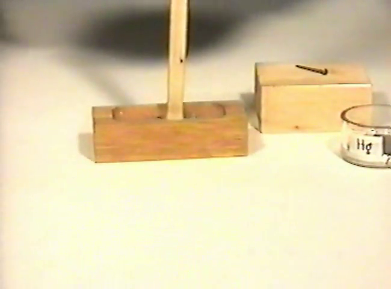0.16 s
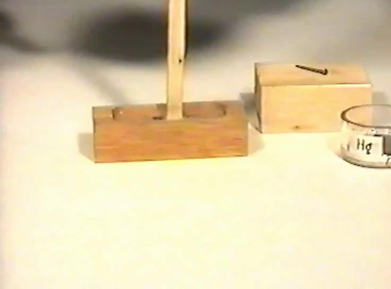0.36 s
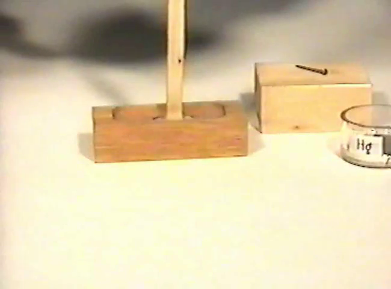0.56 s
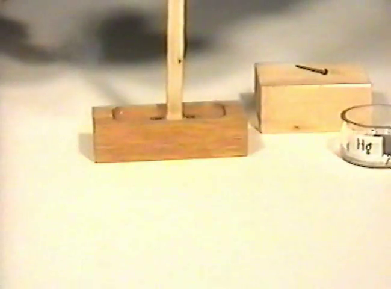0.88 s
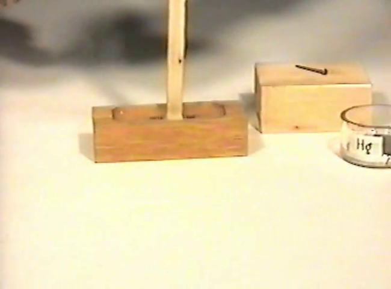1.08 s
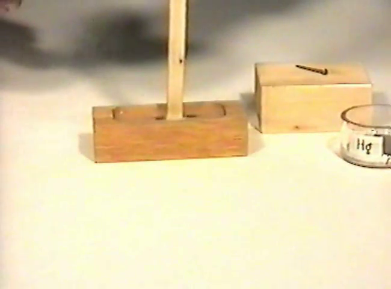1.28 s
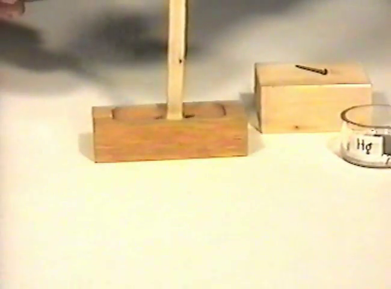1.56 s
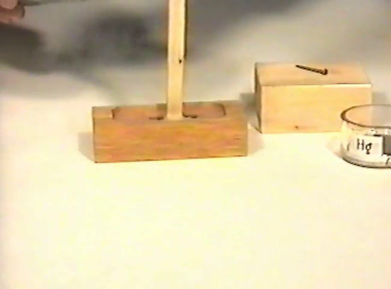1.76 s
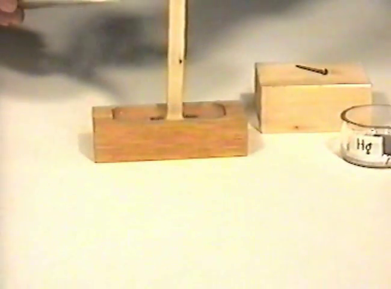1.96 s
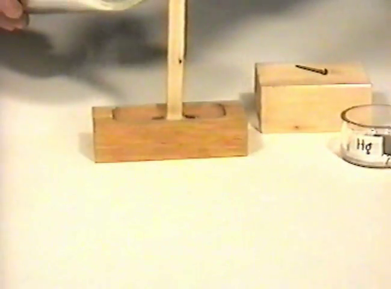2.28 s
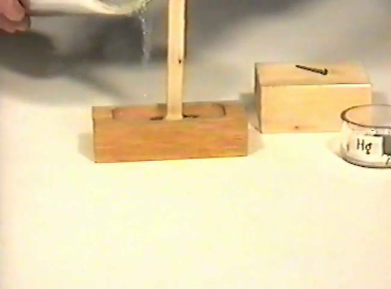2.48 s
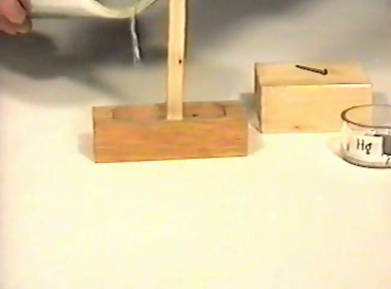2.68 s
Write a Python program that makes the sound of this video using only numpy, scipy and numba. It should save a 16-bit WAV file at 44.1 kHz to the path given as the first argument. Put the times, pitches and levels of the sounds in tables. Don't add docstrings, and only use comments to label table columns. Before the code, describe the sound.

A thin boiling fizz runs throughout, with paired wood ticks near 0.07 s, a soft one at 0.63 and a cluster at 1.06. The hiss swells brightly from 1.3 to 1.7 s with spitting splashes, ticks at 1.8, sinks near 1.9, then surges again from 2.05, strongest and fuller around 2.5-2.8 with spurts and clicks. Quiet room noise, low rumble, faint hum and wavering, hollow tape colour.

```python
import sys
import numpy as np
from scipy import signal
from scipy.fft import rfft, irfft
from scipy.io import wavfile
from scipy.ndimage import uniform_filter1d, map_coordinates
from numba import njit

SR = 44100
rng = np.random.default_rng(int(sys.argv[2]) if len(sys.argv) > 2 else 0)


def pcm_store(signal):
    levels = np.round(np.clip(np.atleast_2d(signal), -1, 1) * 32767)
    wavfile.write(sys.argv[1], SR, levels.astype(np.int16).T)


def volts_from_decibels(level):
    exponent = np.asarray(level, float) / 20
    return 10 ** exponent


N = 125244
T = np.arange(N) / SR

# (frequency [Hz], level [dB])
ROOM_SPECTRUM = [(150, -7.5), (230, -2), (500, -3.5), (1000, -6.5), (2500, -10.5), (4200, -12),
                 (6800, -12.5), (8000, -15.5), (11500, -28)]
ROOM_DB, ROOM_FLICKER_DB = -35.5, 1.28

# (frequency [Hz], level [dB])
RUMBLE_SPECTRUM = [(24, -28), (38, -5), (59, 4.5), (75, -6.5), (100, -10), (125, -19.5), (200, -26),
                   (300, -48)]
# (time [s], level [dB])
RUMBLE_SWELL = [
    (0, -43.5),
    (1.2, -46),
    (1.75, -42.5),
    (1.95, -45),
    (2.84, -42.5),
]
# (time [s], level [dB])
FLOOR_BUMPS = [(0.748, -39.5), (1.04, -45), (1.23, -39), (1.91, -38.5), (1.984, -34.5), (2.099, -41),
               (2.15, -35), (2.391, -34.5), (2.64, -36.5), (2.74, -37), (2.799, -37)]
BUMP_HZ, BUMP_S = 57, 0.032

HUM_HZ, HUM_DB = 149.7, -52.5
# (frequency [Hz], level [dB])
TAPE_SPECTRUM = [(400, -9), (1000, -9), (2300, -16), (5000, -20), (7000, -2), (10400, -3), (11000, -9),
                 (14500, -18)]
TAPE_DB = -50

# (time [s], peak level [dB], contact time [ms])
WOOD_TICKS = [(.0615, -16, .24), (.0733, -16, .45), (.628, -23, .3), (1.0542, -16, .24), (1.0596, -17, .55),
              (1.0728, -25, 1.4), (1.7886, -15, .24), (2.178, -21, .35), (2.19, -18, .45),
              (2.586, -17, .25), (2.743, -18, .4)]
RATTLE_DB, RATTLE_DECAY_S = -18, 0.006

# (time [s], level [dB], extra treble [dB])
BOIL_STRENGTH = [(0.0, -32.5, -1), (0.54, -37, 1), (0.62, -32.5, 0), (1.27, -34, 1), (1.31, -27.5, 4),
                 (1.5, -22, 2), (1.55, -24.5, 2), (1.66, -24.5, 5), (1.87, -36, 1), (2.01, -30.5, 4),
                 (2.07, -24.5, 5), (2.56, -19.5, -4), (2.63, -22.5, 0), (2.77, -19.5, -0.5), (2.84, -24, 4)]
# (frequency [Hz], level [dB])
FIZZ_SPECTRUM = [(900, -30), (1800, -12.5), (2400, -5), (4200, -3.5), (5200, -6), (6700, -3), (7900, -16),
                 (10200, -19), (11500, -50)]
# (frequency [Hz], width [Hz], level [dB])
RESONANCES = [(2267, 49, 0.5), (2723, 78, 3), (3190, 63, 5.5), (3630, 120, -1), (3940, 53, -5),
              (4900, 27, -7), (6800, 600, -11.5)]
# (time [s], level [dB], decay [s], pitch [Hz])
SPLASH_SPURTS = [(1.445, -28, .012, 3300), (1.48, -28, 0.016, 3480), (1.635, -20.5, 0.0067, 6800),
                 (2.16, -20.5, 0.0057, 3270), (2.205, -29, 0.0088, 3200), (2.32, -32, 0.022, 3180),
                 (2.501, -22, .01, 2730), (2.549, -19.5, 0.0088, 3770), (2.584, -21, 0.0043, 2700),
                 (2.72, -41, 0.0096, 3660), (2.771, -20, 0.017, 4900)]
SPURT_SPREAD = 0.16
BUBBLES_PER_S, BUBBLE_CYCLES, BUBBLE_SCATTER_DB, BUBBLE_DB = 1500, 5.9, 3.0, -7.5
GLIDE = 0.45
SPUTTER_DB, SEETHE_DB, TREBLE_HZ = 1, 0.5, 4800
NECK_HZ, NECK_WIDTH_HZ, NECK_DB = 451, 16, -25

# (time [s], lag [ms])
TRACK_LAG = [(0, 1.0325), (0.5, 1.0368), (1, 1.0525), (1.5, 1.0624), (2, 1.049), (2.4, 1.0097),
             (2.84, 0.9257)]
# (rate [turns/s], swing [ms], time of greatest lag [s])
ROLLER_WOW = [(1.014, 0.0284, 1.276), (1.386, 0.0158, 1.231), (2.119, 0.0622, 1.333),
              (2.635, 0.0099, 1.502), (4.246, 0.0303, 1.501), (4.864, 0.0064, 1.343),
              (5.461, 0.0169, 1.403), (6.016, 0.0106, 1.407), (6.433, 0.0346, 1.411),
              (8.523, 0.0102, 1.401), (9.454, 0.0061, 1.435), (10.474, 0.006, 1.369)]
# (frequency [Hz], lag [cycles])
HEAD_PHASE = [(1000, -.04), (3000, -.03), (5000, 0), (7000, .1), (9000, .28), (14000, .5)]
FLUTTER_MS, FLUTTER_PER_S = 0.006, 22
LAG_STEP_S = 0.033
LATE_TRACK_DB, LATE_TOP_HZ = 0, 7600
OFFSET = 0.0129


def level(x, db):
    return x * volts_from_decibels(db) / np.sqrt(np.mean(x ** 2))


def curve(table, at):
    points = np.array(table, float)
    return np.interp(at, points[:, 0], points[:, 1])


def colour(x, points):
    points = np.array(points, float)
    f = np.fft.rfftfreq(N, 1 / SR) + 1
    db = np.interp(np.log(f), np.log(points[:, 0]), points[:, 1], left=-80)
    return irfft(rfft(x) * volts_from_decibels(db), N)


def ring(x, hz, width_hz):
    return signal.lfilter(*signal.iirpeak(hz, hz / width_hz, SR), x)


def walk(rate):
    hold = int(SR / rate)
    steps = np.repeat(rng.standard_normal(N // 200), hold)[:N]
    smooth = uniform_filter1d(uniform_filter1d(steps, hold), hold)
    return smooth / smooth.std()


def patchy(points, lo_hz, hi_hz, flicker_db, rate):
    spectrum = rfft(colour(rng.standard_normal(N), points))
    octave = np.log2(np.fft.rfftfreq(N, 1 / SR) + 1)
    out = 0
    for centre in np.arange(np.log2(lo_hz), np.log2(hi_hz), 1 / 3):
        band = np.clip(1 - 3 * abs(octave - centre), 0, 1)
        out = out + irfft(spectrum * band, N) * volts_from_decibels(flicker_db * walk(rate))
    return out


def room_air():
    return level(patchy(ROOM_SPECTRUM, 134.3, 15000, ROOM_FLICKER_DB, 10.16), ROOM_DB)


def floor_rumble():
    bumps = 0
    for start, db in FLOOR_BUMPS:
        t = T - start
        envelope = np.exp(-(t / BUMP_S) ** 2 / 2)
        bumps = bumps + volts_from_decibels(db + 2) * envelope * np.sin(2 * np.pi * BUMP_HZ * t)
    boom = level(colour(rng.standard_normal(N), RUMBLE_SPECTRUM), 0)
    return boom * volts_from_decibels(curve(RUMBLE_SWELL, T)) + bumps


def hum():
    return level(np.sin(2 * np.pi * HUM_HZ * T), HUM_DB)


def tape_hiss():
    return level(colour(rng.standard_normal(N), TAPE_SPECTRUM), TAPE_DB)


def wood_ticks():
    out = 0
    rattle = level(rng.standard_normal(N), RATTLE_DB)
    for start, db, contact_ms in WOOD_TICKS:
        t = T - start
        u = t / (contact_ms / 1000) * 2
        push = (1 - 0.9 * u ** 2) * np.exp(-u ** 2 / 2)
        tail = 2 * (t > 0) * rattle * np.exp(-abs(t) / RATTLE_DECAY_S)
        out = out - volts_from_decibels(db) * (push + tail)
    return signal.sosfilt(signal.butter(4, 4200, fs=SR, output="sos"), out)


@njit
def grains(n, start, step, size, cycles, glide):
    out = np.zeros(n)
    for g in range(len(start)):
        length = int(cycles * 2 * np.pi / step[g])
        phase = 0.
        for i in range(min(length, n - start[g])):
            phase += step[g] * (1 + glide * i / length)
            out[start[g] + i] += size[g] * np.sin(phase) * np.exp(-5. * i / length)
    return out


def bubbles_and_steam():
    when, pitch, chance = rng.random((int(BUBBLES_PER_S * N / SR), 3)).T
    start = (when * N).astype(np.int64)
    step = 2 * np.pi * (1800 + 7000 * pitch) / SR
    size = volts_from_decibels(-BUBBLE_SCATTER_DB * np.log(1 - 0.995 * chance))
    pops = grains(N, start, step, size, BUBBLE_CYCLES, GLIDE)
    steam = patchy(FIZZ_SPECTRUM, 655, 14000, SEETHE_DB, 14)
    return level(colour(pops, FIZZ_SPECTRUM), BUBBLE_DB) + level(steam, 0)


def vessel_fizz(source):
    out = source
    for hz, width_hz, db in RESONANCES:
        out = out + volts_from_decibels(db + 3.2 * walk(6)) * ring(source, hz, width_hz)
    return level(out, 0)


def splash_spurts(source):
    out = 0
    for start, db, decay_s, hz in SPLASH_SPURTS:
        envelope = (T > start) * np.exp(-abs(T - start) / decay_s / 2)
        out = out + volts_from_decibels(db + 4) * envelope * ring(source, hz, SPURT_SPREAD * hz)
    return out


def flask_neck():
    once = ring(rng.standard_normal(N), NECK_HZ, NECK_WIDTH_HZ)
    return level(ring(once, NECK_HZ, NECK_WIDTH_HZ), NECK_DB)


def boil():
    source = bubbles_and_steam()
    fizz = vessel_fizz(source)
    low = signal.sosfiltfilt(signal.butter(2, TREBLE_HZ, fs=SR, output="sos"), fizz)
    table = np.array(BOIL_STRENGTH)
    strength = volts_from_decibels(curve(table[:, :2], T))
    treble = volts_from_decibels(curve(table[:, ::2], T))
    sputter = volts_from_decibels(SPUTTER_DB * walk(39.67))
    steady = strength * sputter * (low + (fizz - low) * treble)
    return volts_from_decibels(-4.5) * (steady + splash_spurts(source) + strength * volts_from_decibels(3) * flask_neck())


def scene():
    return (room_air() + wood_ticks() + boil())[None]


def track_lag_ms():
    lag = curve(TRACK_LAG, T) + FLUTTER_MS * walk(FLUTTER_PER_S)
    for rate, swing_ms, latest in ROLLER_WOW:
        lag = lag + swing_ms * np.cos(2 * np.pi * rate * (T - latest))
    hold = int(LAG_STEP_S * SR)
    centred = np.minimum(np.arange(N) + hold // 2, N - 1)
    stepped = np.repeat(lag[::hold], hold)[centred]
    return uniform_filter1d(stepped, hold // 2)


def late_track(x):
    f = np.fft.rfftfreq(N, 1 / SR)
    turn = np.exp(-2j * np.pi * curve(HEAD_PHASE, f) * (f > 0))
    gain = (0.88 + 0.12 * np.clip(f / 3500, 0, 1)) / (1 + (f / LATE_TOP_HZ) ** 6)
    played = irfft(rfft(x) * turn * gain, N)
    return map_coordinates(played, [(T - track_lag_ms() / 1000) * SR], mode="mirror")


def low_pass(x):
    return signal.sosfilt(signal.butter(12, 14650, fs=SR, output="sos"), x)


def record(dry):
    comb = dry - volts_from_decibels(LATE_TRACK_DB) * late_track(dry[0])
    mix = comb + floor_rumble() + hum() + tape_hiss() + OFFSET
    return low_pass(mix)


dry = scene()
out = record(dry)
pcm_store(out)
```